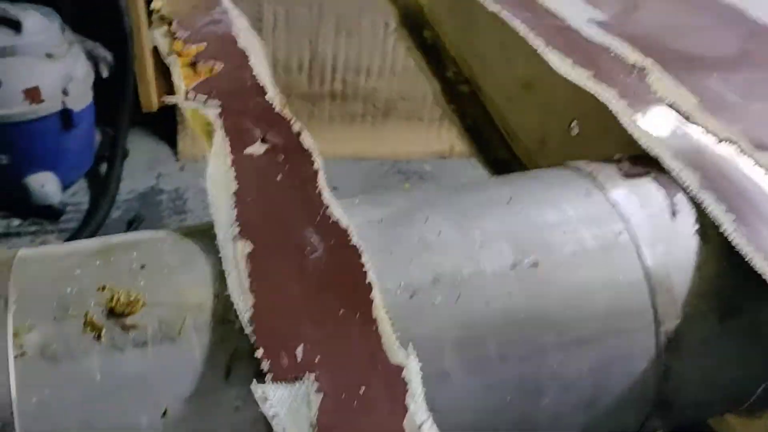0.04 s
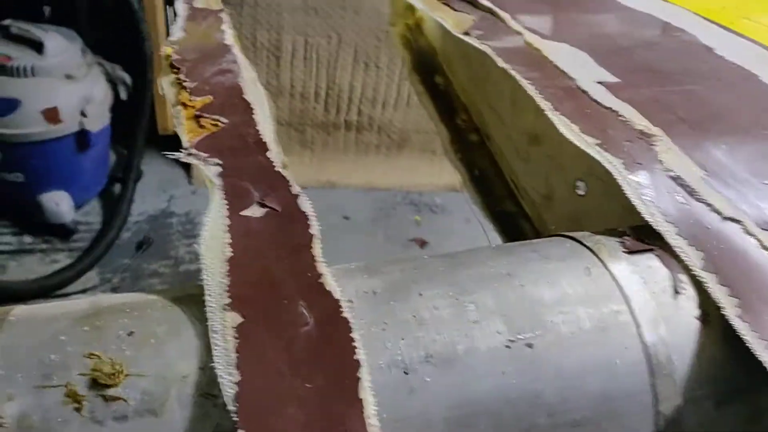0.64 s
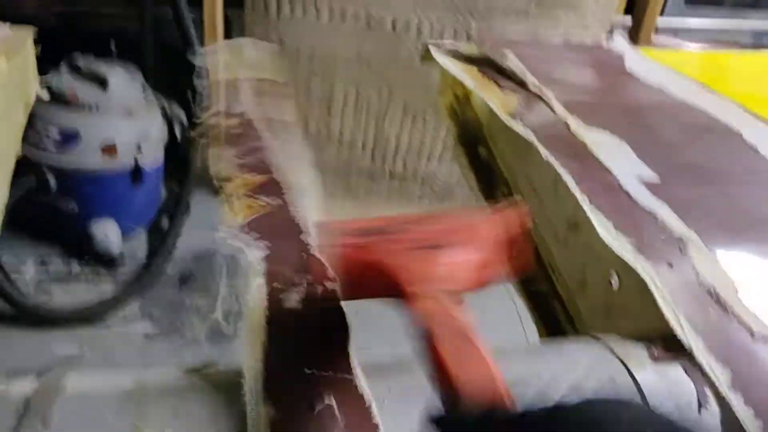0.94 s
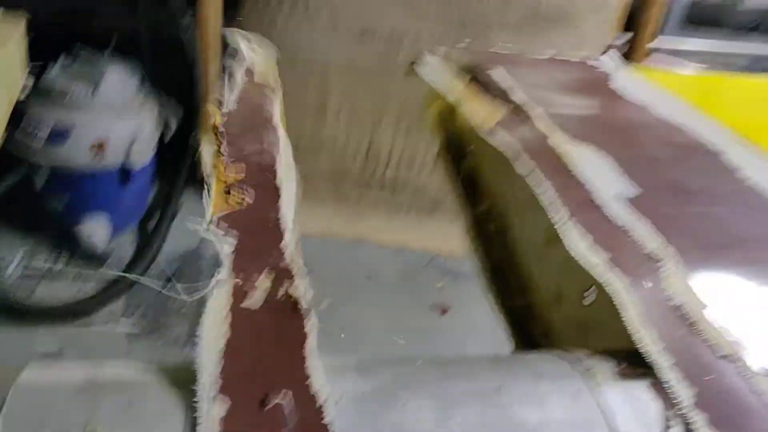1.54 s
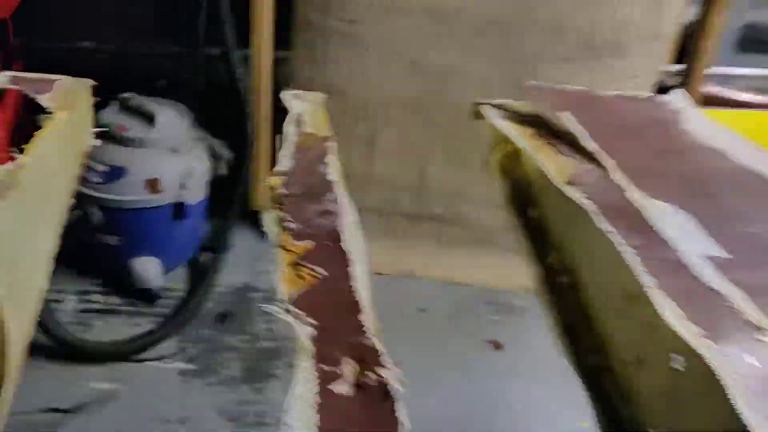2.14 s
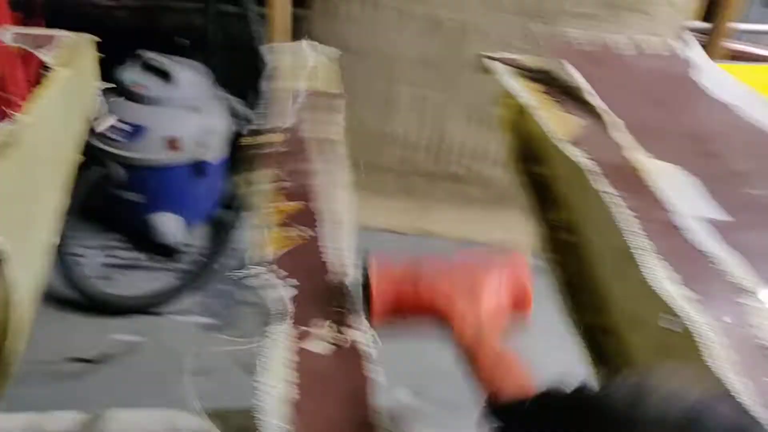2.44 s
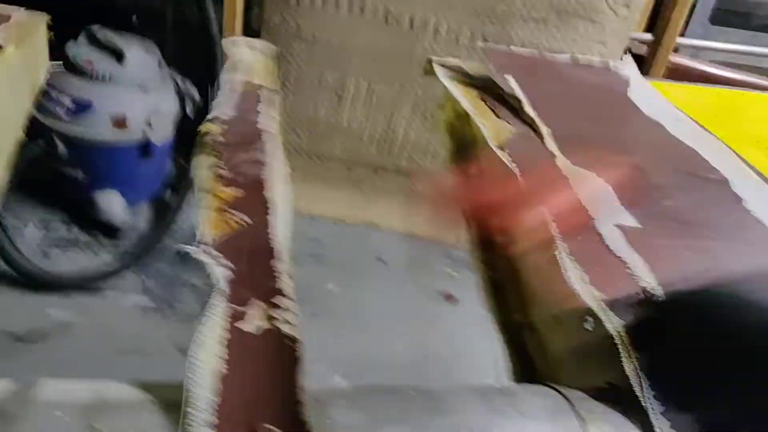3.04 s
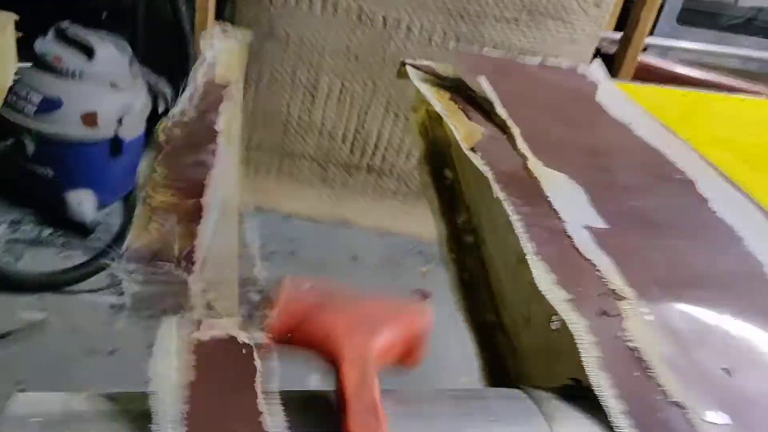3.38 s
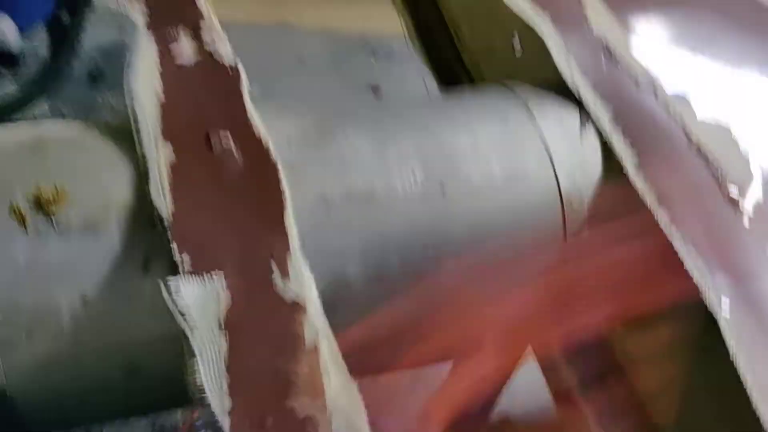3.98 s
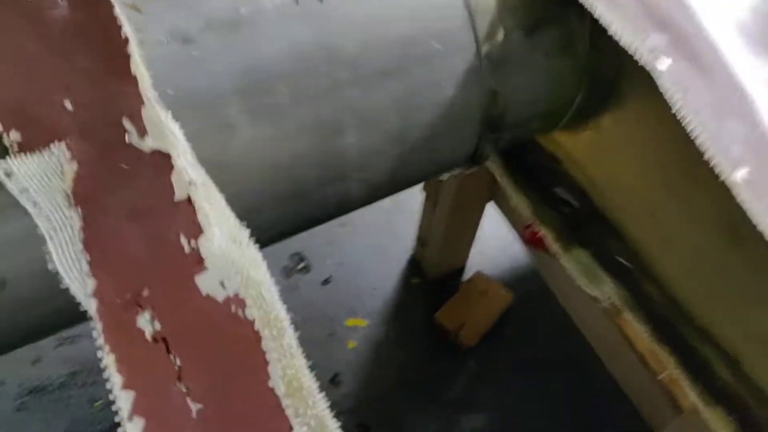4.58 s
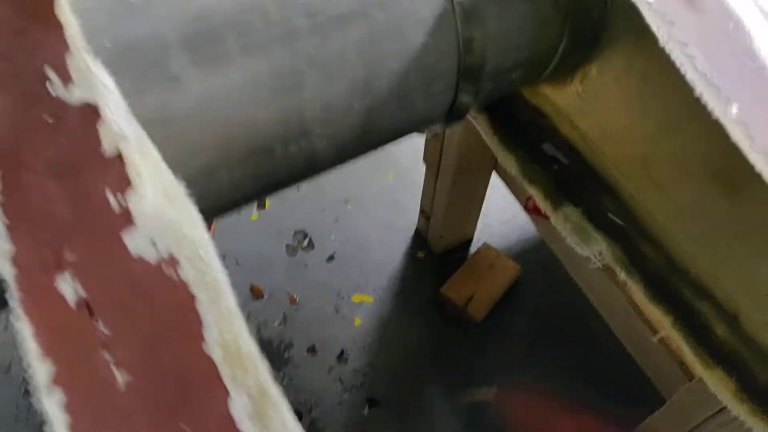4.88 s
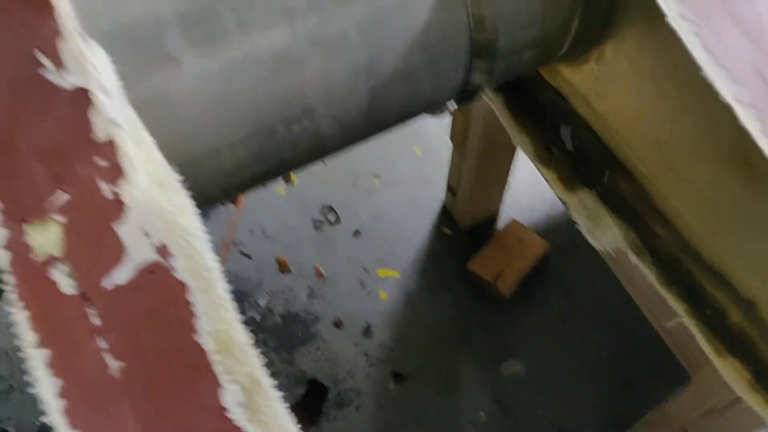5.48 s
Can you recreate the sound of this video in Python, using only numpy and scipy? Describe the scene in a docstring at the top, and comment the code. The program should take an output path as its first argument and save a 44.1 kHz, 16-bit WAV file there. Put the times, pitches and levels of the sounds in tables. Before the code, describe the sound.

Brittle fiberglass is knocked off a metal spar with eight close mallet blows, half a second to a second apart. The hits crack, tear briefly and ring in the hollow shell, some choked by a low thump of air on the microphone. Faint clinks and falling crumbs follow, and a dull thud comes after each of the last two. The workshop adds a short echo and quiet hiss.

```python
"""A hard-walled workshop: a plastic mallet knocks brittle fibreglass skin off a metal spar in eight blows.
Each blow cracks the laminate and booms in the hollow wing; the wing rocks on its trestle, loose metal
jingles and chips fall, all over a bed of room tone. The flapping skin puffs air at the microphone
ports and chokes them, and a limiter flattens the blows."""
import sys
import numpy as np
from scipy import signal
from scipy.fft import rfft, irfft, next_fast_len
from scipy.io import wavfile
from scipy.ndimage import uniform_filter1d, minimum_filter1d, map_coordinates

SR = 44100
rng = np.random.default_rng(int(sys.argv[2]) if len(sys.argv) > 2 else 0)


def to_wav(sig):
    """Store sig (one row per channel, or 1-D mono) as 16-bit WAV at the path in sys.argv[1].

    Samples outside -1..1 are clipped; the rate is SR.
    """
    pcm = np.clip(np.atleast_2d(sig), -1, 1) * 32767
    pcm = np.round(pcm).astype(np.int16)
    wavfile.write(sys.argv[1], SR, pcm.T)  # frames by channels


N = 243431

# tone curves: f/Hz, level/dB
ROOM_TONE_EQ = [(25, 6.5), (50, 0), (90, 7), (120, -18), (175, 0), (300, -9), (650, -14), (1400, -13.5),
                (2400, -20), (3500, -24.5), (5800, -15.5), (7300, -24), (9000, -30), (10700, -54),
                (16000, -35)]  # rumble and hiss
SPLINTER_EQ = [(300, -13.5), (1500, 7.5), (3300, -4), (6000, 7.5), (8500, -6.5), (10500, -18), (15500, -20)]  # small hard fragments
THUD_EQ = [(50, -8), (130, -7.5), (220, 5.5), (350, -1.5), (520, -10), (1300, -25), (3000, -28.5),
           (9000, -45)]  # wing against trestle
BOOM_EQ = [(30, -10.5), (55, -19), (85, -4.5), (125, -26.5), (170, -0.5), (300, -3), (520, -8), (800, -16),
           (2000, -25.5), (6000, -85)]  # the hollow wing
SKIN_EQ = [(30, -14.5), (80, -0.5), (125, -10), (200, -1.5), (550, -4.5), (950, -5), (1800, -6.5),
           (3400, -18.5), (6100, -20), (7400, -27), (9000, -33.5), (10500, -49.5), (15500, -37.5)]  # the fibreglass laminate
# ringing modes: f/Hz, level/dB, t60/s
METAL_MODES = [(1982, 4.5, 0.085), (3062, 3, 0.15), (4420, 7, 0.085), (6080, 2, 0.19), (6330, -1, .12),
               (7800, -13, .085)]  # loose metal
TRESTLE_MODES = [(229.3, -0.5, 0.23), (329.7, 1.5, 0.16), (341.7, -2, 0.2), (427, -1.5, 0.14)]  # the wing knocking on its trestle
WING_MODES = [(83.8, -8.5, 2.4), (161.1, -4, 1.46), (177.2, 3, .97), (199.7, 2.5, 0.67), (229.2, 6, 0.54),
              (247, 1, 1.22), (294, -1, 1.1), (325, -2.5, 0.72), (395.5, 0.5, 0.82), (436, 0, 0.91),
              (547, -1, 0.85), (910, 16, 0.23), (1375, 7, 0.46), (2520, -8, 0.38)]  # the hollow wing
# the workshop's reverb: f/Hz, t60/s
ROOM_DECAY = [(80, 1.55), (250, 0.49), (600, 0.66), (1500, 0.79), (5000, 0.78), (9000, 0.78), (15000, 0.35)]
# stereo image, narrow in the bass: f/Hz, left-right likeness
LIKENESS = [(60, 0.81), (200, 1), (350, 0.88), (550, 0.42), (900, 0.018), (10000, 0)]
# mismatch of the microphone ports: f/Hz, L-R/dB
PORT_BALANCE = [(200, -1), (550, 0), (1000, 2.5), (3000, 1), (6300, 3.5), (7400, -3), (9000, -17.5),
                (15000, -4.5)]
# the clearest chips snapping off and landing: t/s, level/dB, skitter/s
CHIP_FALLS = [(.22, -41.5, 0.089), (.619, -41, 0.085), (0.887, -43, 0.016), (1.207, -37.5, 0.0054),
              (3.978, -34, 0.0099), (4.4503, -42, 0.016)]
# late clinks of loose metal on the spar: t/s, ring/dB, contact/dB
CLINKS = [(1.266, -43.5, -59), (1.385, -38.5, -45), (1.92, -42, -37), (2.108, -45.5, -41.5),
          (2.196, -44, -38), (3.885, -37, -34.5)]
# three ever closer touchdowns of the wing after a blow: delay/s, thud/dB, rattle/dB
TOUCHDOWNS = [(.22, -40.5, -40.5), (.312, -44, -38.5), (.365, -46.5, -47)]
# heavier bumps of the wing on its trestle: t/s, level/dB, reverb send/dB
HEAVY_BUMPS = [(0.692, -35, -3), (1.141, -40.5, 9), (1.795, -37, 11.5), (1.843, -35, 6),
               (4.2779, -13.5, -14.5), (5.166, -23.5, -11), (5.194, -26, -5.5)]
# air puffs at the ports: t/s, first swing/s, left pressure, right pressure
AIR_PUFFS = [(0.317, .073, 0.62, 0.063), (0.968, 0.05, .21, -1.1), (2.95, 0.084, 0.57, 0.036),
             (3.457, .11, -0.67, -0.1), (5.022, .054, 0.97, -0.038)]
# mallet blows: t/s, crack/dB, crack length/s, tear/dB, boom/dB, wing shake/dB, brightness/dB,
# hollow f/Hz, hollow lift/dB, crack L-R/dB
MALLET_BLOWS = [(.319, -9.5, 0.0028, -9, -14.5, -22.5, 5.5, 970, 6, -7),
                (0.9675, -9.5, 0.0025, -4, -23.5, -18, 7, 1157, 1.5, 22),
                (1.545, -9, 0.0064, -6, -10, -15.5, 10.5, 520, 7.5, 8),
                (2.417, -13.5, 0.016, -4, -9, -9, 4, 1240, 2, 11.5),
                (2.948, -10, 0.016, -8.5, -9.5, -9, 6, 970, 3, 3),
                (3.4546, -13.5, 0.0011, -8, -7.5, -11, 6, 960, 3, 7),
                (4.077, -10.5, .017, -9.5, -19.5, -13.5, 1, 900, 6, 8),
                (5.0188, -3.5, 0.0067, -12.5, -15.5, -17.5, 6, 1320, 3.5, 0)]


def amp(db):
    return 10 ** (np.asarray(db) / 20)


def clock():
    """One second of sample times."""
    return np.arange(SR) / SR


def unit(x):
    """Scaled to rms 1."""
    return x / np.sqrt(np.mean(x ** 2) + 1e-20)


def burst(x):
    """A one-second sound scaled to the energy of 50 ms at rms 1."""
    return unit(x) / np.sqrt(20)


def along(curve, hz):
    """A curve's value at hz, on a log frequency axis."""
    freqs, values = np.transpose(curve)
    return np.interp(np.log(hz + 1), np.log(freqs + 1), values)


def add(track, s, x):
    """Mix x into the track at time s."""
    part = track[:, round(s * SR):][:, :x.shape[-1]]
    part += x[..., :part.shape[1]]


def eq(x, curve):
    """Minimum-phase EQ; the curve is a table or a function from Hz to dB."""
    size = 2 * next_fast_len(x.shape[-1] // 2 + SR // 8)
    hz = np.fft.rfftfreq(size, 1 / SR)
    gain_db = curve(hz) if callable(curve) else along(curve, hz)
    cepstrum = irfft(np.log(amp(gain_db) + 1e-6))
    cepstrum[..., 1:size // 2] *= 2
    cepstrum[..., size // 2 + 1:] = 0
    return irfft(rfft(x, size) * np.exp(rfft(cepstrum)))[..., :x.shape[-1]]


def diffuse(size, t60=None):
    """Stereo noise, narrow in the bass and wide on top; an optional t60 curve fades each band."""
    hz, t, spectra = signal.stft(rng.standard_normal((2, size)), SR, nperseg=256)
    width = np.arccos(np.clip(along(LIKENESS, hz), -1, 1))[:, None] / 2
    mid, side = np.cos(width) * spectra[0], np.sin(width) * spectra[1]
    fade = amp(-60 * t / along(t60, hz)[:, None]) if t60 else 1
    return signal.istft(np.array([mid + side, mid - side]) * fade, SR, nperseg=256)[1][:, :size]


def ring(modes, attack_s=0.016):
    """Damped modes, struck at new strengths; the higher ones reach the ports out of step."""
    t, out = clock(), np.zeros((2, SR))
    for hz, db, t60 in modes:
        phase = rng.uniform(0, 2 * np.pi) + rng.standard_normal((2, 1)) * (1 - along(LIKENESS, hz))
        strength_db = db + 2 * rng.standard_normal()
        age = t[t < 2 * t60]
        add(out, 0, amp(strength_db - 60 * age / t60) * np.sin(2 * np.pi * hz * age + phase))
    return burst(out * (1 - np.exp(-t / attack_s)))


def crackle(t60, hold=1, rate_hz=500, scatter_db=6, grain_s=0.0031):
    """Tiny uneven snaps dying away; a high hold keeps them up, then stops them short."""
    snaps = (rng.random(SR) < rate_hz / SR) * amp(scatter_db * np.minimum(rng.standard_normal(SR), 2))
    snaps[0] = 2
    grains = signal.lfilter([1], [1, -np.exp(-1 / (grain_s * SR))], snaps)
    return burst(diffuse(SR) * grains * amp(-60 * (clock() / t60) ** hold))


def room_tone(level_db=-40):
    """The bed: the workshop's steady rumble and hiss."""
    return amp(level_db) * unit(eq(diffuse(N), ROOM_TONE_EQ))


def reverb(build_s=0.011):
    """The hard walls answer a click: the tail builds, then dies away."""
    return burst(diffuse(SR, ROOM_DECAY) * (1 - np.exp(-clock() / build_s)))


def tick(t60, room_db, attack_s):
    """A short scatter of small hard contacts and its reverb."""
    contacts = burst(crackle(t60, rate_hz=1200, scatter_db=2) * (1 - np.exp(-clock() / attack_s)))
    return burst(eq(contacts + amp(room_db) * reverb(), SPLINTER_EQ))


def debris(crumbs_per_blow=2, fall_s=(.13, .45), crumb_db=-47, crumb_t60=.025):
    """Chips tick on the floor, thin and bright; every blow also sheds a few crumbs."""
    out = np.zeros((2, N))
    crumbs = [(s + rng.uniform(*fall_s), crumb_db + 2 * rng.standard_normal(), crumb_t60)
              for s, *_ in MALLET_BLOWS for _ in range(crumbs_per_blow)]
    for s, db, t60 in CHIP_FALLS + crumbs:
        add(out, s, amp(db) * tick(t60, room_db=-9, attack_s=t60 / 10))
    return eq(out, [(2000, -12), (4500, 0)])


def settling(usual_shake_db=-12.5, thud_slope=0.13, rattle_slope=2.4):
    """The harder the wing is shaken, the harder it touches down: yields t/s, thud/dB, rattle/dB."""
    for s, _, _, _, _, shake_db, *_ in MALLET_BLOWS:
        extra_db = shake_db - usual_shake_db
        for delay, thud_db, rattle_db in TOUCHDOWNS:
            yield s + delay, thud_db + thud_slope * extra_db, rattle_db + rattle_slope * extra_db


def jingle(bounce_s=0.014, loss_db=-2.5, detune=0.0094, bounces=6):
    """Loose metal chatters on the spar: each bounce is weaker and shifts the pitches a little."""
    out = np.zeros((2, SR))
    for k in range(bounces):
        s = k * bounce_s * (1 + rng.random()) / 2
        shifted = [(hz * (1 + detune * rng.standard_normal()), db, t60) for hz, db, t60 in METAL_MODES]
        add(out, s, amp(k * loss_db) * ring(shifted, attack_s=.001))
    return burst(out)


def rattles(chatter_db=-0.5):
    """Loose metal rattles each time the wing touches down, and now and then clinks later."""
    out = np.zeros((2, N))
    shaken = [(s, db, db + chatter_db) for s, _, db in settling()]
    for s, ring_db, contact_db in CLINKS + shaken:
        add(out, s, amp(ring_db) * jingle())
        add(out, s, amp(contact_db) * tick(0.071, room_db=-2, attack_s=0.0047))
    return out


def bumps(t60=0.27, knock_db=2, click_db=-15, settling_room_db=7):
    """The wing rocks back on its trestle with soft, hollow thuds."""
    out = np.zeros((2, N))
    thud = lambda x: burst(eq(x, THUD_EQ))
    dull_skin = lambda hz: along(SKIN_EQ, hz) + along([(1000, 0), (4000, -14)], hz)
    for s, db, room_db in HEAVY_BUMPS:
        body = thud(diffuse(SR) * amp(-60 * clock() / t60))
        contact = burst(body + amp(knock_db) * ring(TRESTLE_MODES, attack_s=0.0019))
        click = burst(eq(crackle(t60=0.031), dull_skin))
        add(out, s, amp(db) * (contact + amp(room_db) * thud(reverb()) + amp(click_db) * click))
    for s, db, _ in settling():
        add(out, s, amp(db) * (ring(TRESTLE_MODES) + amp(settling_room_db) * thud(reverb())))
    return out


def puffs(slowing=2.63, attack_s=0.012, fade_swings=9.3, jolt_db=-7, jolt_s=0.0022):
    """The struck skin jolts the air, which swings at the ports, ever more slowly, and fades."""
    out, t = np.zeros((2, N)), clock()
    jolt = amp(jolt_db) * t / jolt_s * np.exp(1 - t / jolt_s)
    for s, first_s, left, right in AIR_PUFFS:
        swings = np.log1p(t * (slowing - 1) / first_s) / np.log(slowing)
        envelope = np.exp(-t / (fade_swings * first_s)) * (1 - np.exp(-t / attack_s)) * (1 - t ** 2)
        add(out, s, np.array([[left], [right]]) * (envelope * np.sin(np.pi * swings) - jolt))
    return out


def skin_ripple(spacing_hz=17, depth_db=1.32):
    """The skin's many overlapping modes ripple its tone: a function from Hz to dB."""
    knots = rng.standard_normal(4096)
    wiggle = lambda hz: map_coordinates(knots, [hz / spacing_hz], mode="mirror")
    return lambda hz: depth_db * np.minimum(hz / 1000, 1) * wiggle(hz)


def hollow(hz, pitch_hz, lower_share=0.5, lower_ratio=0.58, octaves=0.32):
    """The struck patch of skin has two broad resonances: their shape, about 1 at the upper one."""
    hump = lambda centre: np.exp(-(np.log2((hz + 1) / centre) / octaves) ** 2)
    return hump(pitch_hz) + lower_share * hump(lower_ratio * pitch_hz)


def fracture(length_s, count=7, skin_t60=0.092, contact_db=-9, growth_db_per_s=400):
    """The mallet's contact, then a run of growing fibre snaps; each shakes the skin briefly."""
    t = clock()
    starts = length_s * (np.arange(count) + rng.uniform(0, 1, count)) / count
    sizes = amp(2 * rng.standard_normal(count) + growth_db_per_s * starts)
    starts[0], sizes[0] = 0, amp(contact_db)
    power = sum((t >= s) * size ** 2 * amp(-120 * abs(t - s) / skin_t60)
                for s, size in zip(starts, sizes))
    return burst(diffuse(SR) * np.sqrt(power))


def blows(tear_s=0.18, wing_db=-5, splinter_db=-12):
    """Each blow cracks the skin, tears it along the spar and booms in the wing, shaking the room."""
    out, ripple = np.zeros((2, N)), skin_ripple()
    edge = [(200, -3), (1000, 0), (5000, 3)]  # the crack is thinner and brighter than the tear
    for (s, crack_db, crack_s, tear_db, boom_db, shake_db,
         bright_db, hollow_hz, lift_db, pan_db) in MALLET_BLOWS:
        def skin(hz):
            shelf = along([(1800, 0), (5000, bright_db)], hz)
            return along(SKIN_EQ, hz) + shelf + lift_db * hollow(hz, hollow_hz) + ripple(hz)

        crack = burst(eq(fracture(crack_s), lambda hz: skin(hz) + along(edge, hz)))
        tear = burst(eq(crackle(tear_s, hold=2.42, rate_hz=980), skin))
        splinters = burst(eq(crackle(tear_s, hold=0.81, rate_hz=900), SPLINTER_EQ))
        boom = burst(eq(reverb(), BOOM_EQ)) + amp(wing_db) * ring(WING_MODES)
        shake = burst(eq(reverb(), skin))
        add(out, s, amp(crack_db) * crack * amp([[pan_db / 2], [-pan_db / 2]]))
        add(out, s, amp(tear_db) * (tear + amp(splinter_db) * splinters))
        add(out, s, amp(boom_db) * boom + amp(shake_db) * shake)
    return out


def scene():
    """The mix: blows up front, then the rocking wing, what it shakes loose, and the bed."""
    return blows() + bumps() + rattles() + debris() + room_tone()


def limiter(x, ceiling=1.0, release_db_per_s=85):
    """Ducks both channels at once on a peak, then recovers steadily."""
    over_db = 20 * np.log10(np.maximum(abs(x).max(axis=0) / ceiling, 1))
    ramp_db = release_db_per_s * np.arange(N) / SR
    gain = amp(ramp_db - np.maximum.accumulate(over_db + ramp_db))
    return x * uniform_filter1d(minimum_filter1d(gain, size=65), size=65)


def record(dry, end_stop=.66, hardness=8, top_hz=15900):
    """Two unequal ports and a limiter; a puff pins the membrane, which then passes little sound."""
    sound = limiter(eq(dry, lambda hz: np.outer([.5, -.5], along(PORT_BALANCE, hz))))
    pressure = puffs()
    strain = 1 + abs(pressure / end_stop) ** hardness
    choked = np.clip(pressure / strain ** (1 / hardness) + sound / strain, -1, 1)
    size = next_fast_len(N + SR)
    high_cut_db = -np.maximum(np.fft.rfftfreq(size, 1 / SR) - top_hz, 0) / 10
    return irfft(rfft(choked, size) * amp(high_cut_db), size)[:, :N]


dry = scene()
out = record(dry)
to_wav(out)
```